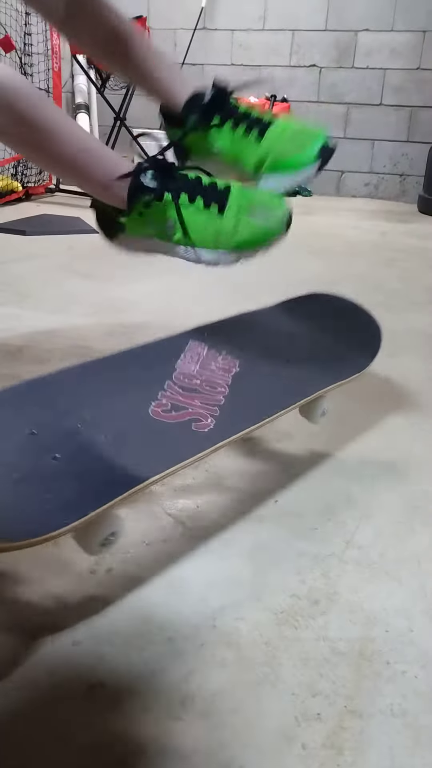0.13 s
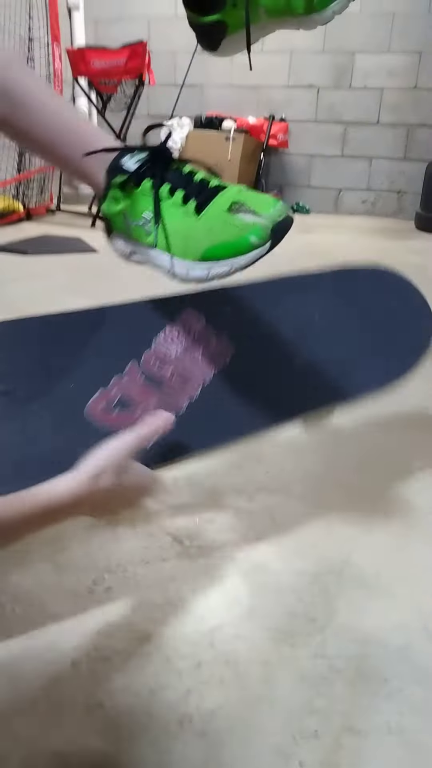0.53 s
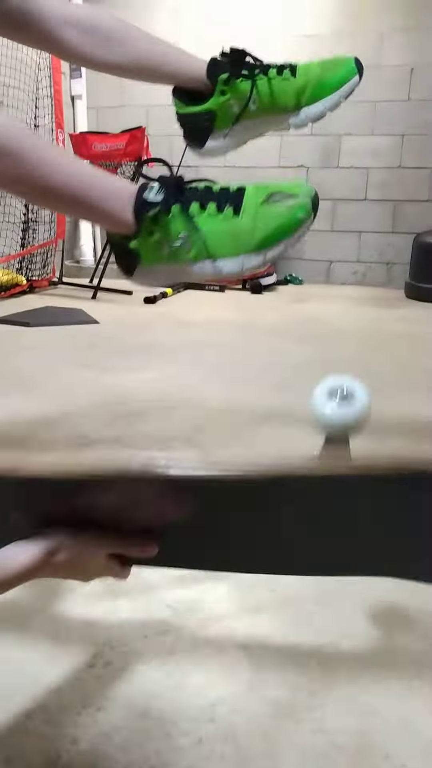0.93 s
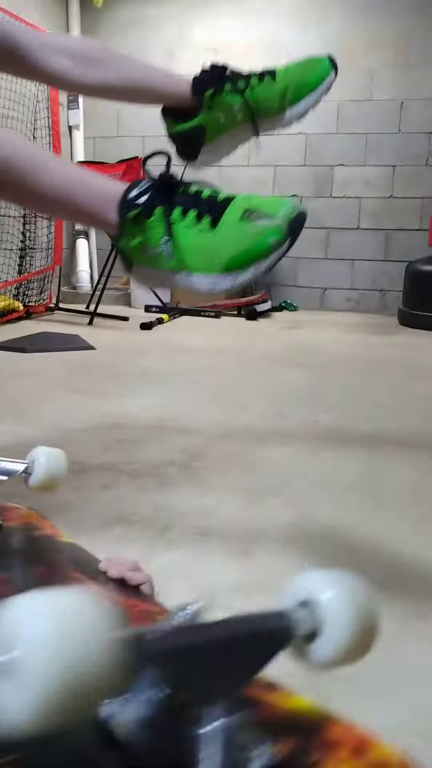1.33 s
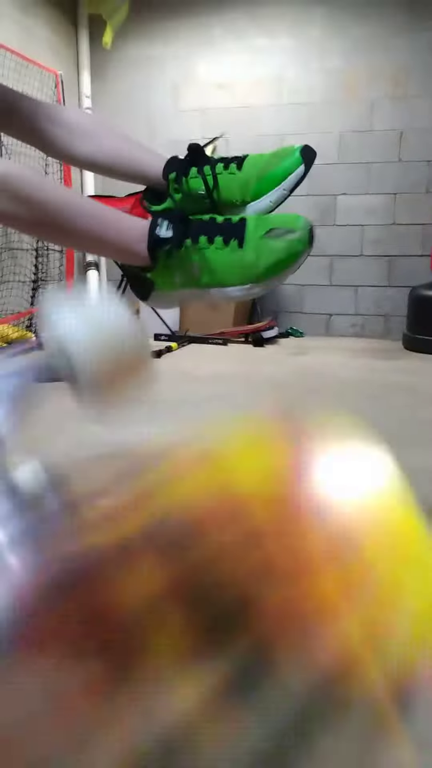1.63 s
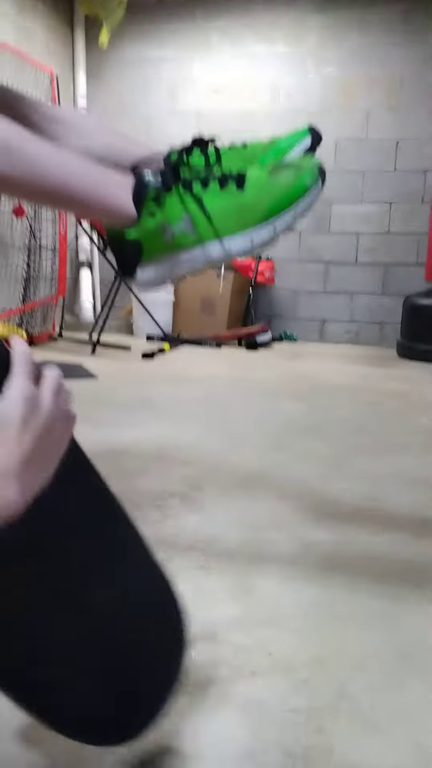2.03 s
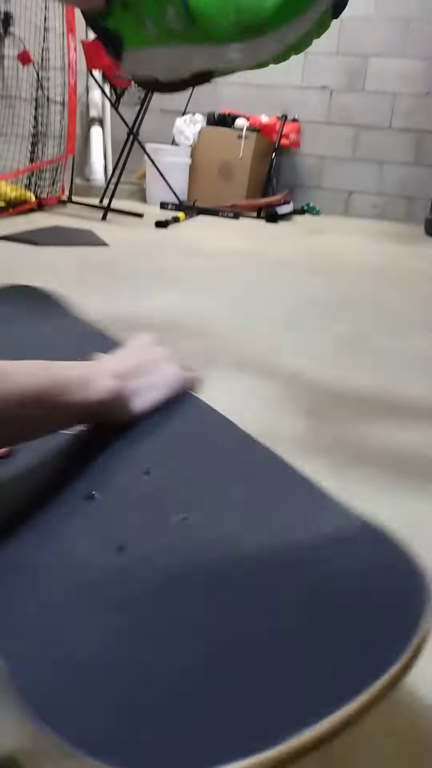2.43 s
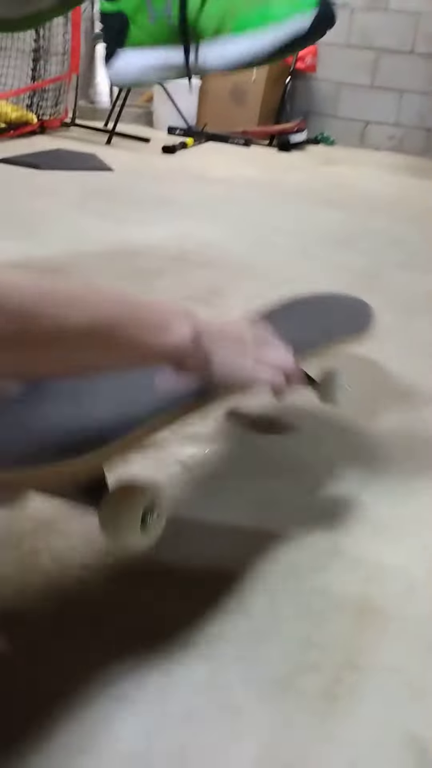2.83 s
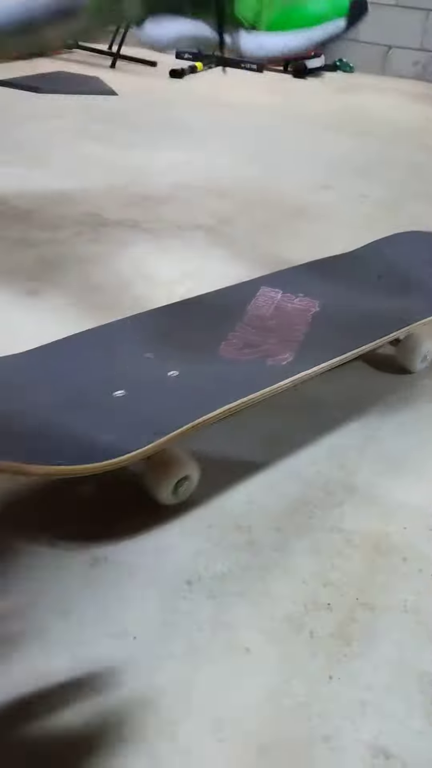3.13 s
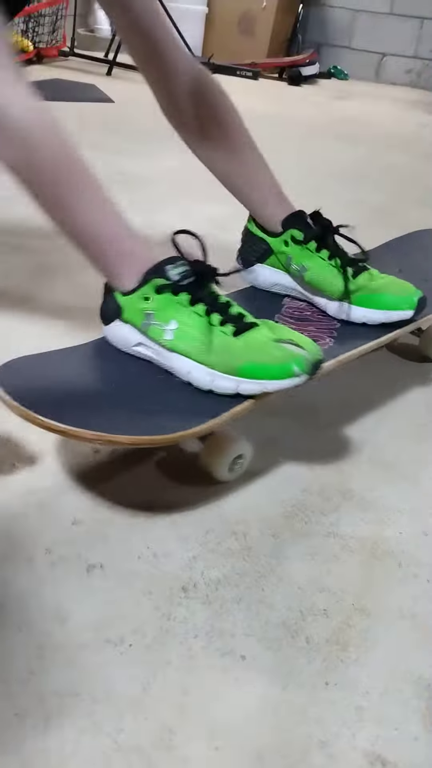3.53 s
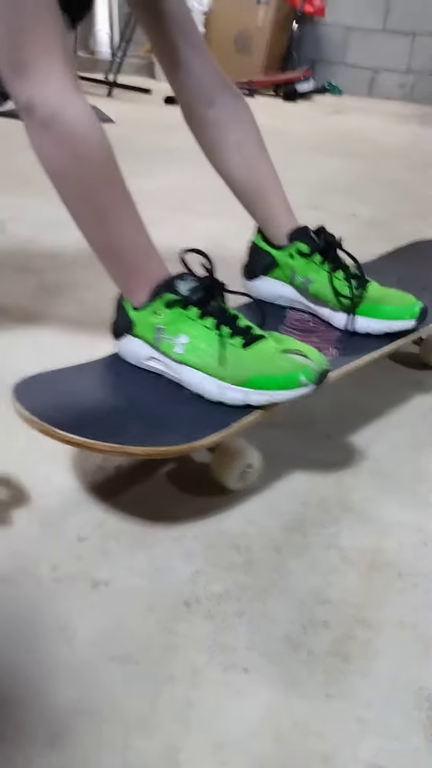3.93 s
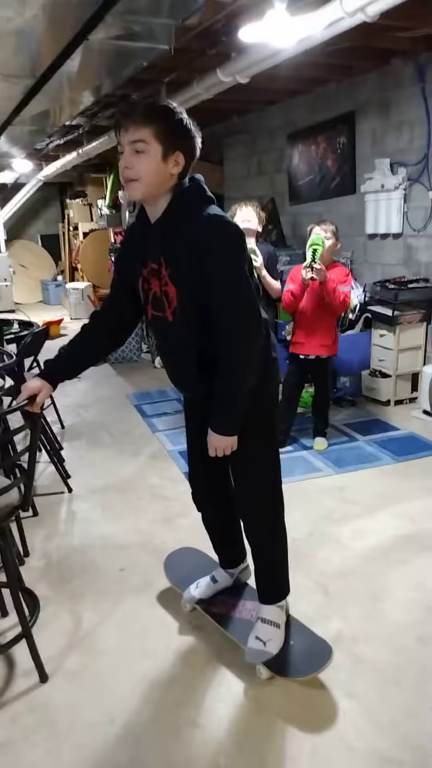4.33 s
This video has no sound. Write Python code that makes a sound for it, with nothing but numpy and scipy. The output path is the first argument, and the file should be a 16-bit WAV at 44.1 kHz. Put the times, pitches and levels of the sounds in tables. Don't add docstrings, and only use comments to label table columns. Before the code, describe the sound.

In a bare concrete basement, fingers faintly tap and scuff a skateboard while loose metal trucks tick and a wheel whirrs. The tail knocks the floor sharply, then the board drops on its wheels with a bright clatter and fading bounces. Two shoes slap the wood. Close stereo microphone, short hard echo, low ventilation rumble and slight hiss.

```python
import sys
import numpy as np
from scipy import signal
from scipy.fft import rfft, irfft, next_fast_len
from scipy.io import wavfile

SR = 44100
rng = np.random.default_rng(int(sys.argv[2]) if len(sys.argv) > 2 else 0)


def dump_mix(stems):
    frames = np.atleast_2d(stems).T
    limited = np.clip(frames, -1, 1)
    pcm = np.round(limited * 32767).astype(np.int16)
    wavfile.write(sys.argv[1], SR, pcm)


def gain_from_decibels(decibels):
    exponent = np.asarray(decibels, float) / 20
    return 10 ** exponent


N = 197610


def rms_one(x):
    return x / np.sqrt(np.mean(x ** 2) + 1e-20)


def at_hz(points, hz):
    points_hz, values = np.array(points).T
    return np.interp(np.log(hz), np.log(points_hz), values)


def band(x, low_hz, high_hz):
    sos = signal.butter(2, [low_hz, min(high_hz, .45 * SR)], "band", fs=SR, output="sos")
    return signal.sosfilt(sos, x)


def drift(rate):
    r = np.exp(-80 * np.pi * rate / SR)
    steps = rng.standard_normal(N // 40 + 2002)
    slow = signal.lfilter([1], [1, -2 * r, r * r], steps)[2000:]
    return np.interp(np.arange(N) / 40, np.arange(len(slow)), rms_one(slow))


def ring(clicks, hz, t60):
    r, w = gain_from_decibels(-60 / (t60 * SR)), 2 * np.pi * hz / SR
    return signal.lfilter([0, np.sin(w)], [1, -2 * r * np.cos(w), r * r], clicks + 1e-18)


def panned(x, pan_db):
    return x * gain_from_decibels(np.array([[pan_db / 2], [-pan_db / 2]]))


def grains(per_s, spread_db):
    sizes = gain_from_decibels(spread_db * np.minimum(rng.exponential(1, N), 4)) * rng.choice([-1, 1], N)
    return sizes * (rng.random(N) < per_s / SR)


def swells(s, level_db, rise_s, fall_s):
    s, level_db, rise_s, fall_s = [np.reshape(v, (-1, 1)) for v in (s, level_db, rise_s, fall_s)]
    late = np.arange(0, N + 64, 64) / SR - s
    span = np.where(late < 0, -rise_s, fall_s)
    power = np.sum(gain_from_decibels(level_db - 20 * late / span) ** 2, axis=0)
    return np.interp(np.arange(N) / 64, np.arange(len(power)), np.sqrt(power))


def struck(s, level_db, modes, touch, spread_db, snap_db):
    chatter_s, pan_db = touch[:, :1], touch[:, 1:]
    later = rng.random((len(s), 6)) * np.arange(6) / 5
    at = np.round((s[:, None] + later * chatter_s) * SR).astype(int)
    out = 1e-9 * rng.standard_normal((2, N))
    for hz, mode_db, t60 in modes + [(0, snap_db, 0)]:
        size = gain_from_decibels((level_db + mode_db)[:, None] + rng.normal(0, spread_db, at.shape) - 11 * later)
        size = size * rng.choice([-1, 1], at.shape)
        tilt, lag = gain_from_decibels(pan_db / 2 + rng.normal(0, 2.6)), rng.integers(-9, 10)
        clicks = np.zeros((2, N))
        np.add.at(clicks[0], at + max(lag, 0), size * tilt)
        np.add.at(clicks[1], at - min(lag, 0), size / tilt)
        out += ring(clicks, hz, t60) if hz else clicks
    return out


# t/s, level/dB, deck share/dB, hardness/dB
TAIL_KNOCK = [
    (1.9095, -25, -21, -32),
    (1.915, -3.5, -12, -27),
    (1.9204, -18.5, -11, -9),
    (1.927, -17.5, -10, -1.2),
    (1.9322, -19, -12, -7),
    (1.9424, -16, -16, -22),
]
DROP = [
    (3.0154, -16, -1.2, -14),
    (3.0181, -8, -13.5, -13),
    (3.0284, -10.5, -1.5, -26),
    (3.0382, -20.5, -2.5, -16),
    (3.047, -15, -3, -11),
    (3.0614, -12.5, -7, 5),
    (3.0658, -11, 0.6, -3),
    (3.0744, -10.5, -10, -1.2),
    (3.0804, -14, -8, -1.2),
]
BOUNCES = [
    (3.1398, -15, -3.5, -8),
    (3.1544, -17, -3.5, -7),
    (3.1662, -13.5, -5.5, -6),
    (3.1906, -19, -0.6, -18),
    (3.2344, -23.5, -5, -18),
    (3.263, -19.5, -13, -18),
]
SHOES = [
    (3.5644, -9, -5, -24),
    (3.5689, -5, -11, -22),
    (3.5774, -15.5, -7.5, -16),
    (3.5845, -5, -9, -18),
    (3.6794, -28, -14, -22),
    (3.7953, -37, -12.5, -24),
    (4.0819, -60, -5, -4),
]
TAPS = [
    (0.1755, -45, 7, -15),
    (0.8633, -37, 2.5, -10),
    (1.1775, -43, -26, -6),
    (1.5928, -33, 2.2, -14),
    (1.721, -35, -15, -20),
    (1.7633, -38, -9, -19),
    (2.2639, -51, -3, -18),
    (2.4923, -44, -13, -15),
    (2.9042, -46, -16.5, -25),
]
# thud level/dB, wheel level/dB, crack level/dB, chatter t/s, left over right/dB
KINDS = [
    (-16, -2.2, -23, .004, 1.5),
    (-13, 0.6, -3, .005, 2.5),
    (-22, 2.5, -12.5, .004, -2.5),
    (-17, -8, -12, .004, 0.1),
    (-2.2, 0.6, -7, .005, 4),
]
# f/Hz, level/dB, t60/s
THUD = [(155, 1.2, 0.086), (205, -3, .12), (283, -1.2, 0.055), (342, -1.2, .05)]
# f/Hz, level/dB, t60/s
DECK = [(382.5, -11, .03), (488, -3, .04), (559.8, 0.1, .06), (638.7, -2.2, .03), (714, 1.2, .04),
        (832, 2.2, .04), (940, -1.2, .03), (1037, -1.2, .03), (1134, 1.2, .03)]
# f/Hz, level/dB, t60/s
FREE_DECK = [(340, -10, .04), (395, -5, .05), (480, -6, .04), (554, 3, .11), (640, -5, .04), (719, -3, .06),
             (846.5, -4, .04), (930, -3, .04), (1145, -4, .04)]
# f/Hz, level/dB, t60/s
LOADED_DECK = [(1600, 0.6, .02), (534, 2.2, .06), (599, -1.2, .04), (686, 2.2, .05), (743, 2.2, .05),
               (830, 1.2, .04), (1104, 1.2, .03), (1322, 2.2, .025)]
# f/Hz, level/dB, t60/s
CLACK = [(1316, -1.2, .015), (1520, -6, .012), (1605, -4, .012), (1880, 2.5, .02), (2030, 2.2, .015),
         (2210, 0.1, .012), (2390, 3, .015), (2570, 2.2, .012), (2813, -5, .01)]
# f/Hz, level/dB, t60/s
WHEELS = [(3150, 0.6, 0.015), (3220, 0.1, .012), (3490, 3, .012), (3880, 4, .02), (4037, 1.2, .02),
          (4460, 1.2, .01), (4900, -1.2, 0.0068)]
# f/Hz, level/dB, t60/s
CRACK = [(5500, -3, .006), (6050, -2, .006), (6900, 0, .007), (7500, 4.5, 0.0028), (8500, -1, .004),
         (9500, -12, .004), (10920, -2, .004), (11930, -2.5, .004), (13500, -7.5, .003),
         (15000, -6.5, .003)]
# start t/s, end t/s
FREE_S = (3.0, 3.4)


def contacts():
    tables = [TAIL_KNOCK, DROP, BOUNCES, SHOES, TAPS]
    rows = np.array([row + kind for table, kind in zip(tables, KINDS) for row in table])
    s, clack_db, deck_db, hard_db, thud_db, wheel_db, crack_db = rows.T[:-2]
    touch = rows[:, -2:]
    thud = struck(s, clack_db + thud_db - 12, THUD, touch, spread_db=1.0, snap_db=14.5)
    held, loaded = s < FREE_S[0], s > FREE_S[1]
    free = (s > FREE_S[0]) & (s < FREE_S[1])
    wood_db = clack_db + deck_db
    deck = struck(s[held], wood_db[held] - 15, DECK, touch[held], spread_db=3.0, snap_db=26.5)
    deck = deck + struck(s[loaded], wood_db[loaded] - 14, LOADED_DECK, touch[loaded], spread_db=3.0, snap_db=19)
    deck = deck + struck(s[free], wood_db[free] - 14, FREE_DECK, touch[free], spread_db=3.0, snap_db=22)
    clack = struck(s, clack_db - 14, CLACK, touch, spread_db=2.5, snap_db=21)
    wheels = struck(s, clack_db + hard_db + wheel_db - 11, WHEELS, touch, spread_db=2.0, snap_db=16.5)
    crack = struck(s, clack_db + hard_db + crack_db - 6.5, CRACK, touch, spread_db=0, snap_db=13.5)
    low = band(band(thud, 80, 450), 70, 900) + band(deck, 200, 2600) + band(clack, 1000, 3603)
    high = band(wheels, 2000, 6000) + band(band(crack, 4500, 17000), 4500, 17000)
    return low + high


# t/s, level/dB, f/Hz
TICKS = [(.049, -50, 2290), (.681, -46, 2400), (.979, -40, 2520), (.995, -38, 2620), (1.087, -44, 2560),
         (1.127, -42, 2560), (1.145, -40, 2450), (1.1655, -28, 2480), (2.502, -39, 2100),
         (2.547, -38, 2020), (2.604, -34, 2270), (2.923, -35, 2030), (2.951, -40, 2200), (2.978, -32, 2580),
         (2.999, -34, 2500)]


def ticks(burst_s, t60):
    out, size = np.zeros((2, N)), SR // 20
    fade = np.exp(-np.arange(size) / SR / burst_s)
    for s, level_db, hz in TICKS:
        clicks = rng.standard_normal((2, 2, size)) * (rng.random(size) < .15) * fade
        pair = ring(clicks[0, 0], hz, t60) + gain_from_decibels(-5) * ring(clicks[1], hz * .96, t60)
        pair = pair / np.abs(pair).max()
        out[:, round(s * SR):][:, :size] += gain_from_decibels(level_db) * pair * gain_from_decibels([[-1], [-6]])
    return band(out, 1200, 3300)


def rub(modes, per_s, spread_db, damping):
    touches, dealt = grains(per_s, spread_db), rng.integers(0, len(modes), N)
    out = 0
    for k, (hz, db, t60) in enumerate(modes):
        out = out + ring(touches * (dealt == k), hz, t60 * damping) * gain_from_decibels(db)
    return rms_one(out)


# t/s, deck level/dB, truck rattle against it/dB, t to fall 20 dB/s
STIRS = [(0.01, -74, 8, .2), (0.19, -49, -12, .3), (0.49, -66, 4, .12), (0.71, -59, 5, .17),
         (0.89, -47, -4, .16), (1.0, -56, 1.2, .1), (1.17, -58, -0.6, .6), (1.3, -59, 0.1, .5),
         (1.62, -55, 0.6, .3), (1.71, -51, -6, .25), (1.89, -57, -1.2, .3), (2.04, -49, 6, .2),
         (2.24, -57, -2.2, .3), (2.5, -55, 1.2, .4), (2.75, -56, -2.2, .4), (2.99, -59, 0.6, .3),
         (3.17, -42, 1.2, .3), (3.25, -36, -2.2, .06), (3.43, -50, -9, .3), (3.63, -50, 7, .25),
         (3.93, -49, -14, .14), (4.09, -66, -1.2, .5), (4.21, -59, -11, .08)]
STIR_RISE_S, STIR_PAN_DB = .07, 5
# t/s, level/dB, t to rise 20 dB/s, t to fall 20
# dB/s
SCUFFS = [(0.01, -72.5, .03, .22), (0.2, -67, .03, .45), (0.49, -67, .13, .05), (0.67, -63, .02, .25),
          (0.862, -56, .015, .06), (0.95, -69, .1, 1.1), (1.28, -69, .6, .7), (1.597, -58, .006, .13),
          (2.496, -57.5, .045, .055), (2.756, -61, .11, .13), (2.93, -69, .12, .2), (3.12, -38, .06, .1),
          (3.36, -60, .035, .075), (3.61, -57, .04, .15), (4.082, -72, .01, .045), (4.214, -80, .03, .06),
          (4.35, -74, .06, .3)]
# f/Hz, level per Hz/dB
SCUFF = [(2060, -28), (3500, 2.5), (4780, -6.5), (5290, 2), (8360, -6.5), (10700, 0), (13100, -10.5),
         (15200, -11.5), (16000, -14.5)]
SCUFF_PAN_DB = 6


def handling():
    s, deck_db, rattle_db, fall_s = np.transpose(STIRS)
    drum = band(rub(DECK, per_s=6600, spread_db=4.0, damping=.3), 250, 2200)
    rattle = band(rub(CLACK, per_s=8000, spread_db=2.0, damping=0.22), 1200, 3600)
    stir = swells(s, deck_db - 6.5, STIR_RISE_S, fall_s) * drum
    stir = stir + swells(s, deck_db + rattle_db - 1.5, STIR_RISE_S, fall_s) * rattle
    grit = [grains(8200, 1.7), grains(9000, 1.7)]
    rasp = 0
    for k, low_hz in enumerate(np.geomspace(3500, 14000, 7)):
        rasp = rasp + band(grit[k % 2], low_hz, low_hz * 1.26) * gain_from_decibels(at_hz(SCUFF, low_hz * 1.12))
    scuffs = gain_from_decibels(-3) * swells(*np.transpose(SCUFFS)) * rms_one(rasp)
    return panned(stir, STIR_PAN_DB) + panned(scuffs, SCUFF_PAN_DB)


# start t/s, end t/s
SPINS_S = (1.15, 3.0)
WHIRR_HZ, WHIRR_DB, SPIN_UP_S = 3750, -74, .15


def wheel(width_hz, shelf_db):
    t = np.arange(N) / SR
    on = np.clip((t - SPINS_S[0]) / SPIN_UP_S, 0, 1) * (t < SPINS_S[1])
    turn = 2 * np.pi * WHIRR_HZ * t
    whirr = drift(width_hz) * np.cos(turn) + drift(width_hz) * np.sin(turn)
    rolling = rms_one(band(band(rng.standard_normal(N), 3000, 4000), 2600, 4050))
    return on * gain_from_decibels(WHIRR_DB) * (whirr + gain_from_decibels(shelf_db) * rolling)


# f/Hz, t60/s
ROOM_T60 = [(100, 0.81), (260, 0.63), (700, 0.53), (1840, 0.46), (4850, 0.31), (12800, 0.16)]
# f/Hz, level/dB
ROOM_COLOUR = [(100, -1), (300, 2.5), (1000, 3.5), (3000, -0.4), (6000, -1), (14000, -4)]
# f/Hz, likeness (1 same, -1 opposite)
LIKENESS = [(60, 1), (180, 0.94), (550, 0.41), (1650, -0.18), (4970, -0.24), (15000, -0.75)]
EDGES_HZ = 25 * 2 ** np.arange(0, 9.6, .5)
ROOM_DB = -4.5
EARLY_DB, EARLY_T60_S = 4, 0.051


def basement(x, build_s):
    t = np.arange(SR) / SR
    common, own = rng.standard_normal((2, 2, 1, SR)), rng.standard_normal((2, 2, 2, SR))
    echo, early = 0, gain_from_decibels(EARLY_DB - 60 * t / EARLY_T60_S)
    for k, (low, high) in enumerate(zip(EDGES_HZ[2:], EDGES_HZ[3:])):
        hz = np.sqrt(low * high)
        alike = np.clip(at_hz(LIKENESS, hz), 0, 1)
        noise = band(np.sqrt(alike) * common[k % 2] + np.sqrt(1 - alike) * own[k % 2], low, high)
        late = gain_from_decibels(at_hz(ROOM_COLOUR, hz) - 60 * t / at_hz(ROOM_T60, hz))
        echo = echo + noise * (late + early)
    echo = echo * (1 - np.exp(-t / build_s))
    echo = echo / np.sqrt(np.sum(echo ** 2) / 2)
    size = next_fast_len(N + SR)
    return irfft(np.sum(rfft(x, size)[:, None] * rfft(echo, size), axis=0), size)[:, :N]


# f/Hz, level per Hz/dB
AIR = [(12, -50), (20, -30), (74, -1), (168, 1.5), (399, -18.5), (590, -4.5), (698, -21), (849, -16.5),
       (1400, -25), (2530, -24), (3070, -36), (4420, -42), (10200, -41), (14700, -51.5), (16000, -52)]
# t/s, level/dB, t to fall 20 dB/s
BOOMS = [
    (0.03, -53, .4),
    (0.95, -53, .3),
    (1.25, -53, .9),
    (1.62, -52, .3),
    (2.12, -51, .4),
    (2.6, -54, .6),
    (3.3, -52, .4),
    (3.62, -46, .25),
    (3.87, -53, .6),
    (4.25, -55, .1),
]
BOOM_RISE_S, RUMBLE_DB = .25, -59


def air(patchy_db):
    s, boom_db, fall_s = np.transpose(BOOMS)
    bass = np.hypot(gain_from_decibels(RUMBLE_DB), swells(s, boom_db, BOOM_RISE_S, fall_s))
    out, white = 0, rng.standard_normal((2, 2, N))
    for k, (low, high) in enumerate(zip(EDGES_HZ, EDGES_HZ[1:])):
        mid, side = band(white[k % 2], low, high)
        hz = np.sqrt(low * high)
        alike = np.clip(at_hz(LIKENESS, hz), -1, 1)
        swell = bass if hz < 350 else gain_from_decibels(-55)
        gain = swell * gain_from_decibels(at_hz(AIR, hz) + 20.0 + patchy_db * drift(8))
        out = out + gain * (np.sqrt(1 + alike) * mid + np.sqrt(1 - alike) * side * [[1], [-1]])
    return out


def scene():
    board = contacts() + ticks(burst_s=.004, t60=.012) + handling() + wheel(width_hz=90, shelf_db=-1.5)
    echo = gain_from_decibels(ROOM_DB) * basement(board, build_s=.001)
    return board + echo + panned(air(patchy_db=2.2), 1.5)


def top_cut(x):
    return signal.sosfilt(signal.butter(12, 16470, fs=SR, output="sos"), x)


CUTOFF_HZ, HISS_DB, END_S = 16050, -77, 4.412


def record(dry):
    running = np.clip((END_S - np.arange(N) / SR) / 0.004, 0, 1)
    top = signal.cheby2(18, 65, CUTOFF_HZ + 500, fs=SR, output="sos")
    rounded = 1.281 * np.tanh(dry / 1.125)
    hiss = gain_from_decibels(HISS_DB) * rng.standard_normal(dry.shape)
    return top_cut(signal.sosfilt(top, rounded + hiss) * running)


dry = scene()
out = record(dry)
dump_mix(out)
```